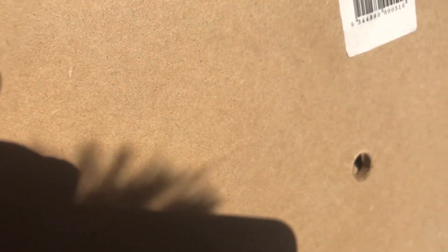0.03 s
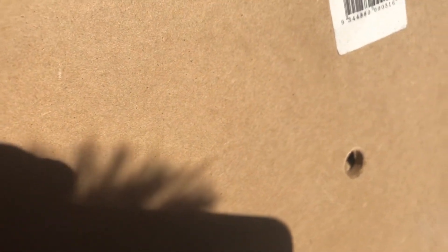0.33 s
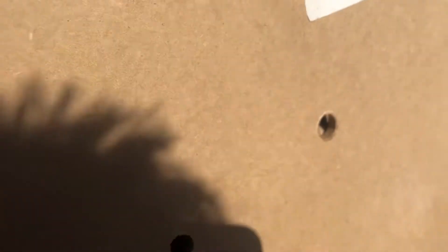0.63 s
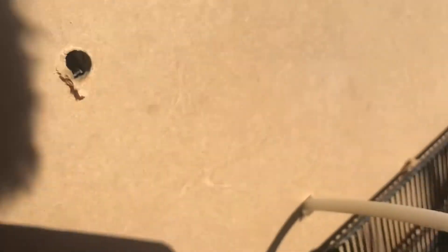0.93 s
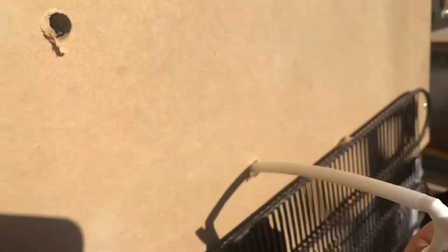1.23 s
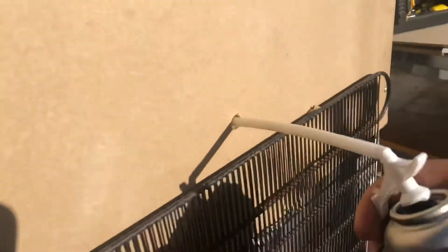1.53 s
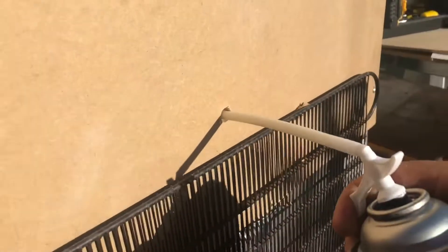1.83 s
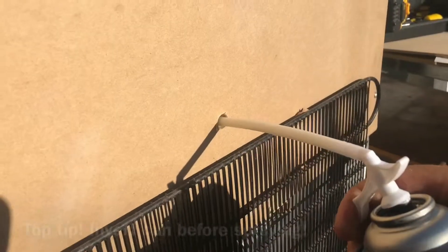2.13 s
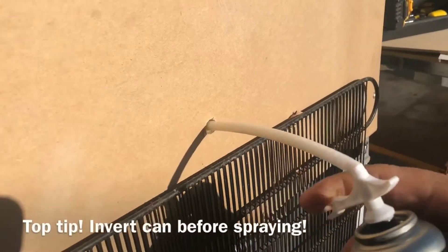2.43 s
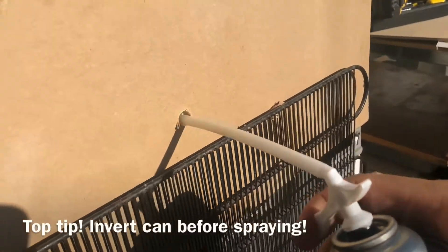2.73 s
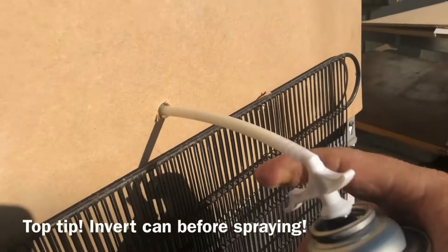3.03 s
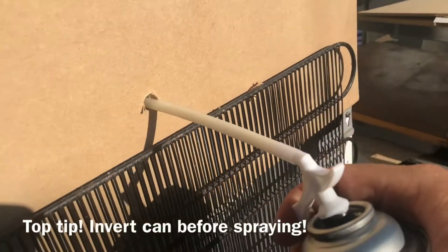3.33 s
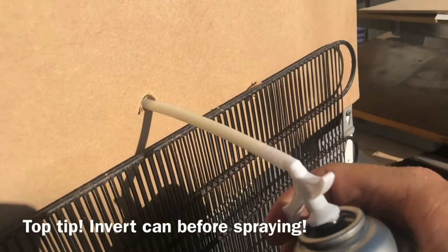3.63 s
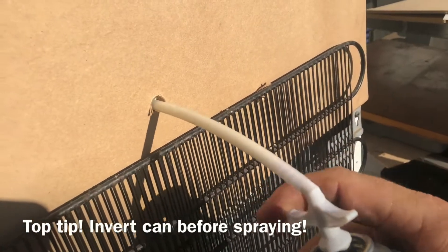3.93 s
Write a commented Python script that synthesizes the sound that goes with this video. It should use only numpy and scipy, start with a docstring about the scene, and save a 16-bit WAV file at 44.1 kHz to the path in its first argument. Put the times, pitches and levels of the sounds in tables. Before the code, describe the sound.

Aerosol foam sputters and hisses through a straw into a hole in a board. One long, wet burst is followed by two shorter ones with small plops and trigger ticks, close up outdoors, with faint wind on the microphone.

```python
"""Aerosol foam sputters through a straw into a hole in a board, outdoors, in three bursts.
Gas pockets pop and plop out of the straw and ring the board and the hollow behind it; the valve hisses.
The microphone swings round to the can in the first second, so the board's echo sweeps through the hiss.
The foam squeaks once, and after the first burst the straw sits differently, changing the tone.
The trigger ticks twice, and a freshening breeze rumbles on the microphone."""
import sys
import numpy as np
from scipy import signal
from scipy.fft import rfft, irfft, next_fast_len
from scipy.io import wavfile
from scipy.ndimage import map_coordinates

SR = 44100
rng = np.random.default_rng(int(sys.argv[2]) if len(sys.argv) > 2 else 0)


def int16_out(signal):
    """Quantize to a 16-bit WAV file."""
    q = np.round(np.clip(np.atleast_2d(signal).T, -1, 1) * 32767)
    wavfile.write(sys.argv[1], SR, q.astype(np.int16))


N = 176400


def amp(db):
    """Decibels to gain."""
    return 10 ** (np.asarray(db) / 20)


def unit(x):
    """Scaled to rms 1."""
    return x / np.sqrt(np.mean(x ** 2) + 1e-20)


def clock():
    """The time of every sample, in seconds."""
    return np.arange(N) / SR


def noise():
    """White noise."""
    return rng.standard_normal(N)


def wobble(rate):
    """A smooth random modulator, rate knots a second."""
    return map_coordinates(rng.standard_normal(int(N * rate / SR) + 4), [clock() * rate])


def swells(rows):
    """Bell-shaped envelopes from rows of (time [s], length [s], level [dB])."""
    return sum(amp(db) * np.exp(-2 * ((clock() - s) / length) ** 2) for s, length, db in rows)


def filtered(x, response):
    """x times a complex response of frequency."""
    size = 2 * next_fast_len(N // 2 + SR // 8)
    return irfft(rfft(x, size) * response(np.fft.rfftfreq(size, 1 / SR)), size)[:N]


def coloured(x, eq):
    """x through a minimum-phase EQ of (frequency [Hz], gain [dB]) points, then scaled to rms 1."""
    def response(hz):
        eq_hz, db = np.transpose(eq)
        cepstrum = irfft(np.log(amp(np.interp(np.log(hz + 1), np.log(eq_hz), db))))
        half = len(cepstrum) // 2
        causal = np.r_[cepstrum[0], 2 * cepstrum[1:half], cepstrum[half], np.zeros(half - 1)]
        return np.exp(rfft(causal))
    return unit(filtered(x, response))


def ring(x, modes):
    """x through parallel resonators of alternating polarity."""
    def response(f):
        return sum((-1) ** k * amp(db) * 1j * f * width / (hz * hz - f * f + 1j * f * width)
                   for k, (hz, width, db) in enumerate(modes))
    return filtered(x, response)


def wandering(x, depth, rate):
    """x with its resonances drifting up and down by a share, depth, of their pitch."""
    drift = depth * wobble(rate)
    return map_coordinates(x, [np.arange(N) + np.cumsum(drift - drift.mean())], mode="mirror")


def scattered(x, t60_s=.07, wet_db=-14):
    """x with a short dense tail from things nearby."""
    t = np.arange(SR // 8) / SR
    tail = rng.standard_normal(len(t)) * amp(-60 * t / t60_s)
    reverb = signal.fftconvolve(x, tail / np.linalg.norm(tail))[:N]
    wet = amp(wet_db)
    return (x + wet * reverb) / np.hypot(1, wet)


def placed(x, eqs, mid_swing_s=0.74, swing_length_s=0.55, reseat_s=2.47):
    """x through one EQ per position in turn: microphone aside, microphone at the can, straw reseated."""
    t = clock()
    swung = np.clip(.5 + (t - mid_swing_s) / swing_length_s, 0, 1)
    shares = [1 - swung, swung * (t < reseat_s), t >= reseat_s]
    return sum(share * coloured(x, eq) for share, eq in zip(shares, eqs))


def pops(per_s, scatter_db, rush):
    """Gas pockets bursting at uneven intervals and sizes, over some rushing gas."""
    bursting = rng.random(N) < per_s / SR
    train = bursting * amp(scatter_db * np.clip(noise(), -2, 2))
    return unit(unit(train - train.mean()) + rush * noise())


# Fader moves for each burst, ahead of the layers' trims
# (time [s], sputter [dB], boom [dB], rasp [dB], hiss [dB], sizzle [dB])
FIRST_BURST = [(0.0, -25.5, -18, -36, -47, -53), (0.03, -25.5, -28.5, -46.5, -44.5, -51),
               (0.13, -22.5, -30, -41.5, -43.5, -49.5), (0.21, -28.5, -30.5, -48, -44, -54),
               (0.32, -23.5, -30, -38, -45, -56), (0.45, -24, -33, -39.5, -42, -47),
               (0.52, -33, -32, -50.5, -42.5, -54), (0.63, -24.5, -31.5, -40, -46.5, -53),
               (0.86, -23, -29.5, -39, -45, -50), (0.97, -25, -33.5, -41, -42, -48),
               (1.05, -26, -33.5, -39.5, -42.5, -38.5), (1.07, -30, -38, -45.5, -40.5, -51),
               (1.11, -30.5, -31, -45.5, -45.5, -54), (1.3, -22.5, -35, -37.5, -42.5, -48),
               (1.33, -28.5, -33, -44.5, -45, -53), (1.54, -29.5, -31, -44, -42.5, -47),
               (1.66, -35.5, -30, -50, -44.5, -54), (1.81, -29, -28.5, -43.5, -46, -49),
               (1.89, -34, -31, -49, -45, -51), (2.06, -31.5, -29, -47.5, -47.5, -52),
               (2.17, -29.5, -32.5, -46, -43.5, -47.5), (2.31, -33, -29.5, -51, -43, -45),
               (2.35, -41, -40, -59, -54, -58), (2.37, -49, -42, -78, -67, -70),
               (2.41, -60, -50, -83, -80, -83)]
SECOND_BURST = [(2.52, -73, -69, -67, -64, -83), (2.538, -37.5, -44, -72, -58, -74),
                (2.558, -45, -40, -61, -49.5, -48), (2.589, -41, -42, -62, -49, -43),
                (2.597, -30.5, -36, -50, -54, -43), (2.646, -32, -39, -51, -45.5, -37.5),
                (2.756, -35, -46.5, -48, -40.5, -47), (2.804, -33.5, -37, -50.5, -43, -52),
                (2.92, -38, -42, -51, -44.5, -51), (2.936, -41, -41, -63, -49, -52),
                (2.958, -59, -55, -79, -78, -83), (2.97, -65, -45, -78, -82, -82)]
THIRD_BURST = [(3.01, -68, -56, -79, -77, -72), (3.014, -65, -46, -61, -55, -65),
               (3.048, -81, -70, -69, -51.5, -64), (3.059, -33.5, -37.5, -55, -42, -50),
               (3.092, -39, -35.5, -46, -42, -42), (3.146, -30, -30, -36, -40.5, -40.5),
               (3.166, -31, -35.5, -47, -39.5, -47), (3.26, -31.5, -38.5, -47, -44, -49),
               (3.294, -35, -36.5, -46.5, -41.5, -46), (3.42, -35, -36, -52, -47, -55),
               (3.506, -29, -37, -44.5, -44, -43.5), (3.658, -38, -35.5, -50, -43.5, -51),
               (3.684, -36, -44, -54, -40, -51), (3.72, -42.5, -35.5, -50.5, -43.5, -48),
               (3.75, -51, -42.5, -68, -59, -64), (3.814, -57, -60, -63, -67, -63),
               (4.0, -73, -71, -83, -82, -80)]


def flow(edge_s=0.0086):
    """The valve opens and shuts three times: one envelope for each of the spray's five layers."""
    t, gains = clock(), 0
    for burst in (FIRST_BURST, SECOND_BURST, THIRD_BURST):
        s, *faders = np.transpose(burst)
        gate = np.clip(1 + np.minimum(t - s[0], s[-1] - t) / edge_s, 0, 1)
        gains = gains + gate * np.array([amp(np.interp(t, s, db)) for db in faders])
    return gains


# The board's resonances (frequency [Hz], width [Hz], gain [dB])
BOARD_RESONANCES = [(497.6, 37, -0.5), (567.7, 43, 2), (712, 96, -3), (840, 28.4, 3), (965, 154, -4),
                    (1168, 112, -2), (1364, 193, -4.5), (1553, 68, -2), (1689, 72, -3), (1920, 55, -6)]
# Midrange sputter, one EQ per position (frequency [Hz], gain [dB])
SPUTTER_EQS = [
    [(150, -23), (400, -9), (520, -4), (900, 0), (1060, -1), (1350, -1.5), (1650, -4), (1900, -6),
     (2100, -7), (2600, -17), (6000, -38)],
    [(150, -68), (400, -3), (520, -0.5), (900, 2), (1060, -4.5), (1280, 2), (1650, -5), (1900, -6),
     (2080, -9), (2600, -11), (6000, -44)],
    [(150, -18), (380, -7), (520, -2), (640, 4), (860, 1), (1020, -5), (1350, -1.5), (1650, -5),
     (1900, -6.5), (2150, -21), (2600, -20), (6000, -47)],
]


def board_sputter(pockets, envelope, trim_db=-0.5):
    """Bursting gas pockets ring the board."""
    return placed(ring(pockets, BOARD_RESONANCES), SPUTTER_EQS) * envelope * amp(trim_db)


# Resonances of the hollow (frequency [Hz], width [Hz], gain [dB])
HOLLOW_RESONANCES = [(175.8, 20.7, -0.5), (230.4, 46.8, -2.5), (250.7, 30, -0.5), (303, 27, -5.5),
                     (378, 85, -9.5)]
# Low body, one EQ per position (frequency [Hz], gain [dB])
BOOM_EQS = [
    [(40, -31), (115, -11), (165, -4), (250, 1.5), (310, -4.5), (380, 0), (450, -10), (900, -23),
     (3000, -61)],
    [(40, -37), (115, -7.5), (165, -3), (250, 1), (320, 0.5), (380, -4), (450, -6), (900, -33), (3000, -70)],
    [(40, -12), (115, 7.5), (165, -3.5), (220, -4), (310, 2.5), (380, 0.5), (450, -3.5), (900, -26),
     (3000, -67)],
]


def hollow_boom(pockets, envelope):
    """The same pops boom in the hollow behind the board."""
    return placed(ring(pockets, HOLLOW_RESONANCES), BOOM_EQS) * envelope


# Wet upper-mid bite, one EQ per position (frequency [Hz], gain [dB])
RASP_EQS = [
    [(1200, 1.5), (2150, 3.5), (2380, 2.5), (2700, -2), (3000, 4), (3350, -5.5), (3750, -6.5), (4300, -13),
     (5000, -8), (8000, -15)],
    [(1200, -28), (2060, 0.5), (2260, 4.5), (2480, 3.5), (2750, -2.5), (3000, -4), (3350, -4), (3800, -12),
     (4400, -9.5), (5000, -9.5), (8000, -23)],
    [(1200, -15), (2050, 5.5), (2290, 6.5), (2530, -3.5), (2900, -2.5), (3150, 2), (3500, -3.5),
     (4300, -6.5), (5000, -19), (8000, -20)],
]


def straw_rasp(pockets, envelope, trim_db=1.5):
    """Foam spits with a wet, wavering rasp at the tip of the straw."""
    spit = placed(pockets + .5 * noise(), RASP_EQS)
    return scattered(wandering(spit, depth=.035, rate=30)) * envelope * amp(trim_db)


# The jet's hiss, one EQ per position (frequency [Hz], gain [dB])
HISS_EQS = [
    [(3000, -10.5), (4400, -0.5), (4900, -3), (5550, 1.5), (6400, -4), (7450, -1), (8300, -3.5),
     (9500, -8.5), (10500, -17), (13000, -25)],
    [(3000, -9), (4500, -6.5), (5200, -4.5), (6850, -3.5), (7550, 2.5), (8300, 1.5), (8700, 1.5),
     (9450, -2), (10300, -6), (11500, -13), (14000, -32)],
    [(3000, -21), (4500, -8), (5350, -4.5), (5750, -5), (6100, -6.5), (7150, -2), (7600, -2), (8250, 2.5),
     (8600, 1.5), (9250, -1.5), (9700, -4), (10400, -10), (14000, -26)],
]
# Its top-end sizzle (frequency [Hz], gain [dB])
SIZZLE_EQ = [(5000, -37), (9500, 0.5), (10700, -3.5), (11500, 1), (12200, -2.5), (13000, 5), (13600, 0.5),
             (14400, 1), (15500, 0)]


def valve_jet(hiss, sizzle, hiss_trim_db=-0.5, sizzle_trim_db=3):
    """Fine fizzing jet noise from the valve, with a flickering sizzle on top."""
    fizz = pops(per_s=7000, scatter_db=6.5, rush=0.99) * amp(0.84 * wobble(120) + 1.16 * wobble(22.34))
    top = coloured(noise(), SIZZLE_EQ) * amp(1.2 * wobble(200) + 0.4 * wobble(28.4))
    return placed(fizz, HISS_EQS) * hiss * amp(hiss_trim_db) + top * sizzle * amp(sizzle_trim_db)


# Early reflections (time [s], board delay [ms], board gain [ratio], can delay [ms], can gain [ratio])
REFLECTIONS = [(0, .68, .16, .405, .14), (.3, .69, .16, .405, .14), (.56, .755, .22, .42, .06),
               (.8, .905, .25, .68, .06), (1.04, 1.07, .14, .72, .26), (1.2, 1.14, .15, .68, .03),
               (1.5, 1.17, .1, .65, .15), (2.35, 1.21, .13, .645, .16), (2.55, 1.2, .04, .66, .33),
               (2.68, 1.2, .04, .66, .33), (2.8, 1.2, .04, .66, .08)]


def close_echoes(jet):
    """Echoes off the board and the can comb the jet; the comb sweeps as the microphone moves."""
    def delayed(ms):
        return map_coordinates(jet, [np.arange(N) - ms * SR / 1000])
    s, *lanes = np.transpose(REFLECTIONS)
    board_ms, board_gain, can_ms, can_gain = (np.interp(clock(), s, lane) for lane in lanes)
    return jet + board_gain * delayed(board_ms) + can_gain * delayed(can_ms)


# Wind rumble (frequency [Hz], gain [dB])
WIND_EQ = [(20, -23), (45, -9.5), (75, -0.5), (120, -4.5), (200, -11), (500, -51), (2000, -125)]
# Puffs on the microphone (time [s], length [s], level [dB])
WIND_PUFFS = [(2.58, 0.033, -39), (2.965, 0.069, -56), (3.76, .06, -72)]


def wind(midway_db=-54, rise_db_per_s=1.7, lumps_db=2.2):
    """A lumpy, freshening breeze buffets the microphone."""
    breeze_db = midway_db + rise_db_per_s * (clock() - 2) + lumps_db * wobble(9)
    return coloured(noise(), WIND_EQ) * (amp(breeze_db) + swells(WIND_PUFFS))


# Outdoor ambience (frequency [Hz], gain [dB])
AIR_EQ = [(88, -32), (150, -7), (162, -7), (314, -12.5), (583, -16), (751, -16.5), (2230, -22.5),
          (2500, -24.5), (3620, -30.5), (8490, -33), (15500, -43)]


def open_air(level_db=-54.5):
    """A quiet, steady bed of outdoor noise."""
    return amp(level_db) * coloured(noise(), AIR_EQ)


# Peaks in the hiss (time [s], lower band [Hz], upper band [Hz], level on top of the hiss fader [dB])
BAND_GLIDES = [(0.35, 9500, 11500, -30), (.52, 9200, 11000, -13), (.68, 8450, 10400, -10),
               (.85, 7550, 9500, -11), (1.0, 7700, 8900, -12.5), (1.3, 7650, 8500, -9),
               (1.5, 7600, 9400, -9), (1.9, 7850, 9450, -7), (2.3, 7600, 9250, -10),
               (2.45, 7600, 9250, -40)]


def sliding_bands(hiss, width_hz=520, flicker_db=2.5, trim_db=-1):
    """Two narrow bands of noise slide down as the microphone swings, then waver."""
    s, lower_hz, upper_hz, db = np.transpose(BAND_GLIDES)
    t, out = clock(), 0
    for hz in (lower_hz, upper_hz):
        a, b = (filtered(noise(), lambda f: 1 / (1 + (2 * f / width_hz) ** 4)) for _ in range(2))
        phase = 2 * np.pi * np.cumsum(np.interp(t, s, hz)) / SR
        band = a * np.cos(phase) + b * np.sin(phase)  # low-passed noise shifted up to the glide
        out = out + unit(band * amp(flicker_db * wobble(13.3)))
    return out * amp(trim_db + np.interp(t, s, db)) * hiss


# Larger gas pockets (time [s], length [s], level [dB])
GULP_CUES = [(1.01, 0.049, -29), (1.275, 0.026, -38), (1.56, 0.015, -28.5), (2.71, 0.032, -35),
             (2.802, 0.0083, -28.5), (3.135, 0.046, -23.5)]
# Their wet tone, also the splat of the plops (frequency [Hz], gain [dB])
GULP_EQ = [(200, -17), (500, -1.5), (900, -0.5), (1400, 9), (1850, -1), (2300, -19), (3000, -30),
           (6000, -58)]


def gulps():
    """Larger gas pockets ring the board in short gurgling swells."""
    gurgle = ring(pops(per_s=690, scatter_db=-1.5, rush=0.6), BOARD_RESONANCES)
    return coloured(gurgle, GULP_EQ) * swells(GULP_CUES)


# One squeak (time [s], length [s], start pitch [Hz], end pitch [Hz], level [dB])
SQUEAK_CUE = (1.695, .05, 3700, 3050, -46)


def foam_squeak():
    """The foam squeaks in the hole: a brief, rough, falling whistle."""
    s, length, start_hz, end_hz, db = SQUEAK_CUE
    progress = np.clip((clock() - s) / length, 0, 1)
    hz = (start_hz + (end_hz - start_hz) * progress) * (1 + .04 * wobble(500))
    arch = 2 * np.sqrt(progress * (1 - progress))
    return amp(db) * arch * np.sin(2 * np.pi * np.cumsum(hz) / SR)


# Trigger ticks (time [s], level [dB])
TICK_CUES = [(2.381, -37.5), (3.014, -42)]
# Their plastic snap (frequency [Hz], gain [dB])
TICK_EQ = [(200, -14), (800, 4), (1300, -9), (2900, -13), (4000, -3), (4900, 1), (5800, -1), (6400, -6),
           (9000, -8), (15000, -10)]


def trigger(snap_t60_s=0.0056, knock_hz=940, knock_t60_s=0.032, knock_db=-0.5):
    """The plastic trigger ticks as it is let go or taken up, with a small knock from the can."""
    crack, out = coloured(noise(), TICK_EQ), 0
    for s, db in TICK_CUES:
        age = np.maximum(clock() - s, 0)
        snap = crack * amp(-60 * age / snap_t60_s)
        knock = amp(knock_db - 60 * age / knock_t60_s) * np.sin(2 * np.pi * knock_hz * age)
        out = out + amp(db) * (age > 0) * (snap + knock)
    return out


# Valve whistles (time [s], length [s], level [dB])
WHISTLE_CUES = [(2.57, 0.027, -51), (2.65, 0.088, -45), (2.905, 0.032, -40.5), (3.1, .05, -46),
                (3.21, .04, -53), (3.70, 0.032, -43)]
# Their piercing peaks (frequency [Hz], gain [dB])
WHISTLE_EQ = [(4000, -23), (5200, -17), (5750, 3), (6200, -4), (6500, 4), (7100, -4), (8200, 2), (9200, 2),
              (10000, -16), (12900, -1), (13500, 2), (14200, -10), (15500, -13)]


def valve_whistles():
    """The half-open valve gives a breathy whistle as it opens or closes."""
    return coloured(noise(), WHISTLE_EQ) * swells(WHISTLE_CUES)


# Single gas pockets (time [s], pitch [Hz], level [dB])
PLOP_CUES = [(2.599, 744, -18.5), (2.640, 900, -23), (2.792, 830, -19.5), (3.061, 765, -25.5),
             (3.092, 950, -26)]


def plops(attack_s=.0006, t60_s=0.025, splat_gain=0.22):
    """Single pockets burst out of the straw with a short hollow note and a wet splat."""
    splat, out = coloured(noise(), GULP_EQ), 0
    for s, hz, db in PLOP_CUES:
        age = np.maximum(clock() - s, 0)
        envelope = amp(db - 60 * age / t60_s) * (1 - np.exp(-age / attack_s))
        out = out + envelope * (np.sin(2 * np.pi * hz * age) + splat_gain * splat)
    return out


def scene():
    """The mono mix: foam, valve, outdoor bed and spot effects."""
    sputter, boom, rasp, hiss, sizzle = flow()
    pockets = pops(per_s=1100, scatter_db=3.0, rush=0.68) * amp(0.21 * wobble(70))
    foam = board_sputter(pockets, sputter) + hollow_boom(pockets, boom) + straw_rasp(pockets, rasp)
    jet = valve_jet(hiss, sizzle) + valve_whistles()
    valve = scattered(close_echoes(jet) + sliding_bands(hiss))
    return (foam + valve + wind() + open_air() + gulps() + foam_squeak() + trigger() + plops())[None]


def record(dry, top_hz=15800):
    """A brick-wall low-pass on the mix."""
    return np.array([filtered(x, lambda hz: hz < top_hz) for x in dry])


dry = scene()
out = record(dry)
int16_out(out)
```